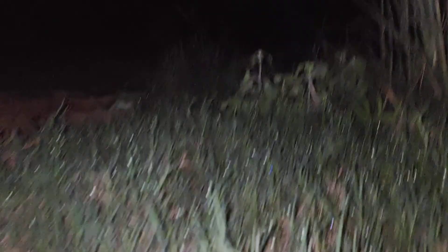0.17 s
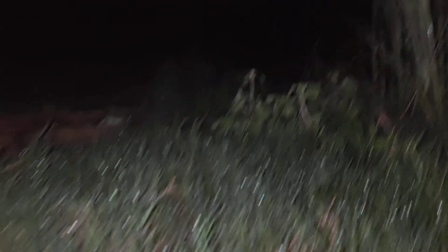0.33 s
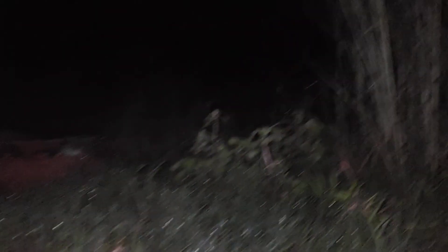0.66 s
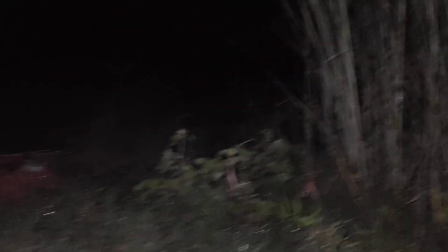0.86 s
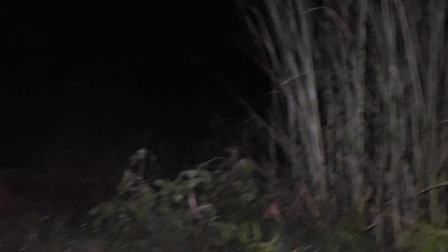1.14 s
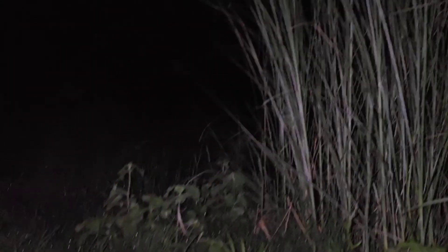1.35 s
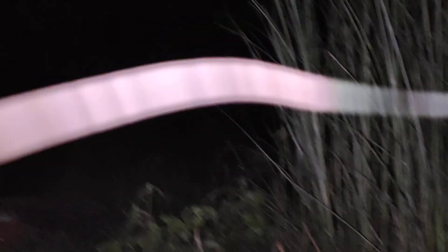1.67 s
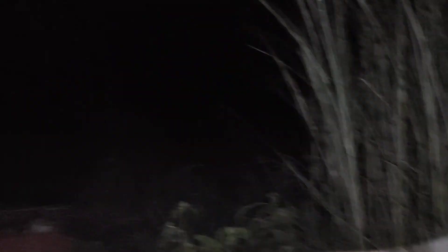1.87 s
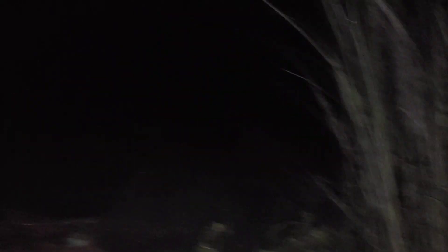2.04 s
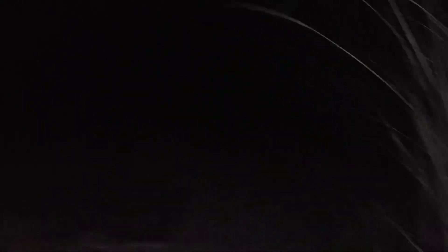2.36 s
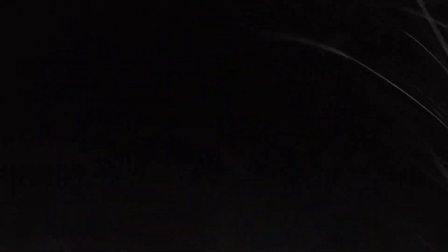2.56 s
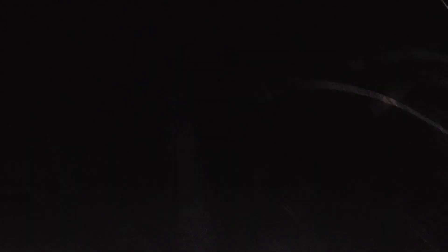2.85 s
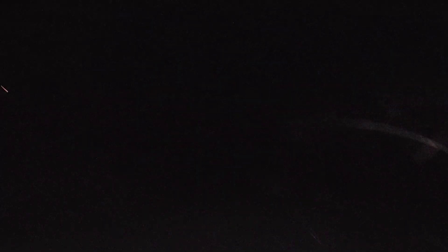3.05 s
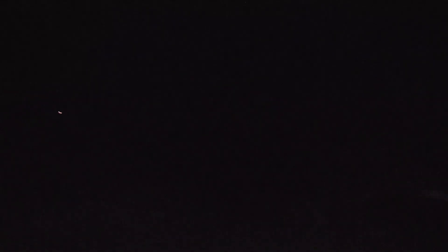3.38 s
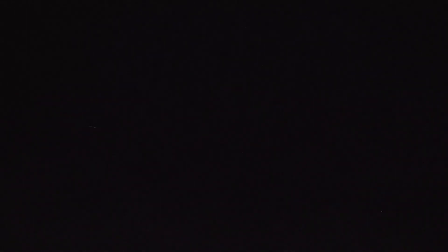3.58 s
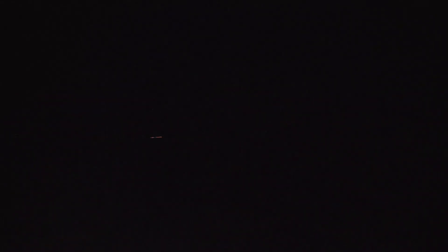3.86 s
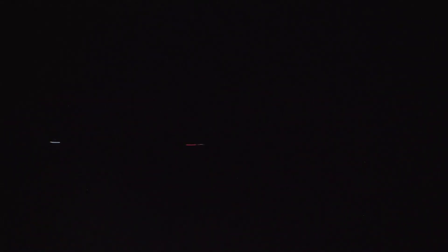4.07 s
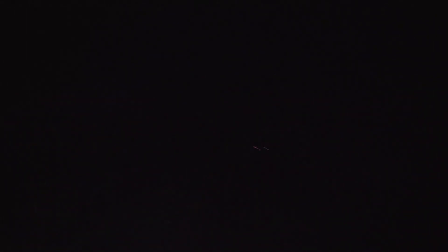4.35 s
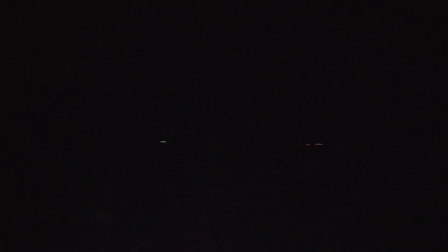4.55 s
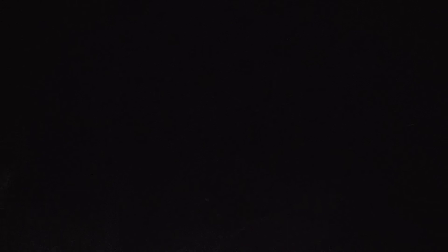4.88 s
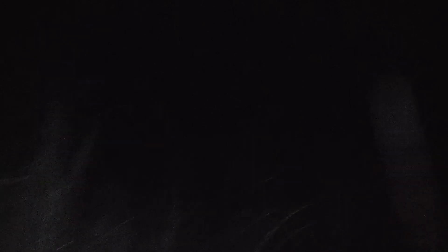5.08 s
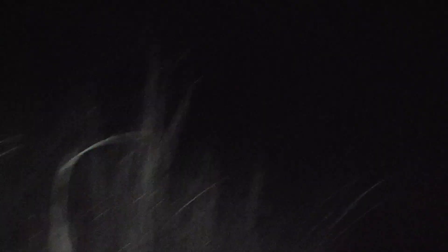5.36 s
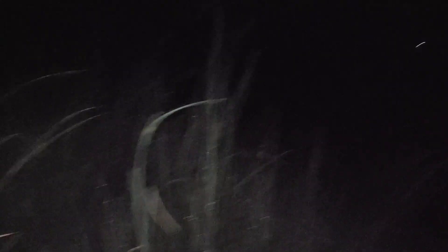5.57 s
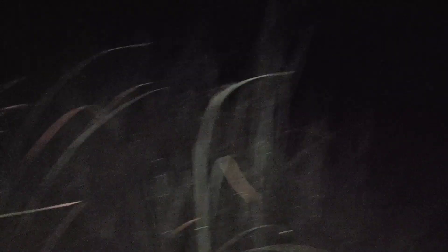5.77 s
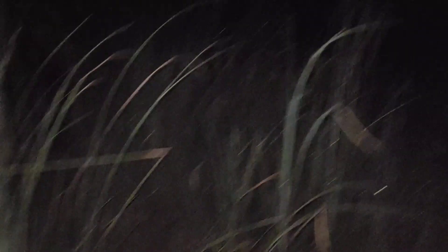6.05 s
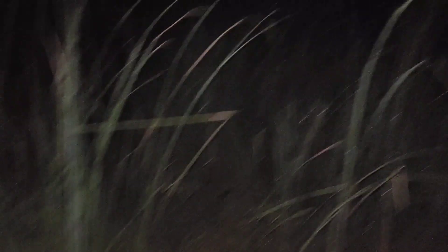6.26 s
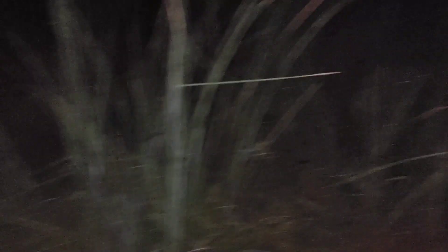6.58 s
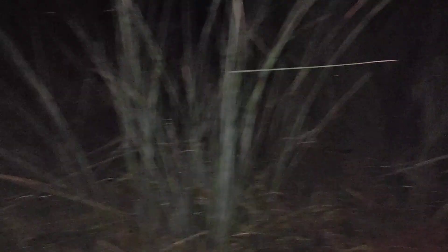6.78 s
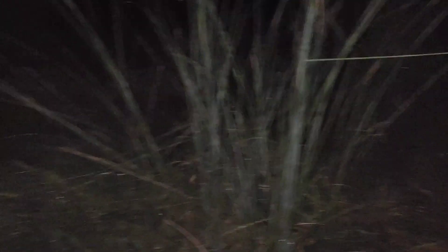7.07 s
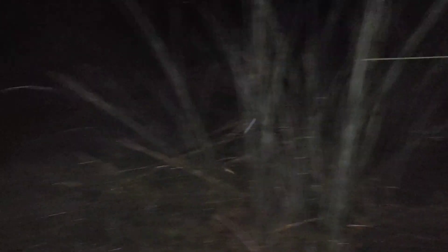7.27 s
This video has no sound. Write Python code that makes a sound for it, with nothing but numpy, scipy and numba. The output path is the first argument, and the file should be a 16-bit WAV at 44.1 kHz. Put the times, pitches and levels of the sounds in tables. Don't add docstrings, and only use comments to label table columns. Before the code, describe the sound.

Outdoors at night among tall grass, a close cricket gives quick double chirps over fast trills, rasping katydids and a steady high buzz. Far down a road a small motorbike thumps and climbs in pitch, falls to faint burbles mid-way for a gear shift, then settles into a low purr. One dry tick lands at about 2.5 seconds. Handheld stereo phone, turning slowly, so the insects shift in strength and side.

```python
import sys
import numpy as np
from scipy import signal
from scipy.fft import rfft, irfft
from scipy.io import wavfile
from scipy.ndimage import uniform_filter1d
from numba import njit

SR = 44100
rng = np.random.default_rng(int(sys.argv[2]) if len(sys.argv) > 2 else 0)


def transcribe(u):
    v = np.clip(np.atleast_2d(u).T, -1, 1)
    q = np.round(v * 32767).astype(np.int16)
    wavfile.write(sys.argv[1], SR, q)


def magnitude_from_level(level_db):
    exponent = np.asarray(level_db, float) / 20
    return 10 ** exponent


N = 327222

# (time [s], lag of the left port behind the right for the road [samples])
TURNING = [(0, 17.5), (1.4, 22.5), (2.3, 17), (3.2, 15), (4.1, 8.5), (5, -8.5), (5.8, -17), (7.42, -19)]
# (time [s], low chorus level [dB], high chorus level [dB], conehead level [dB])
STEADY_SINGERS = [(0.0, -57, -70, -69.5), (0.18, -57.5, -86, -68), (0.8, -58.5, -81, -69.5),
                  (1.6, -61.5, -61, -67.5), (2.2, -56.5, -60.5, -66), (3.0, -61.5, -55, -64),
                  (3.78, -55.5, -54, -63.5), (4.2, -53.5, -56, -63), (4.71, -52.5, -55, -63),
                  (5.6, -54.5, -56, -61.5), (6.3, -54, -59, -62), (7.09, -54.5, -59, -66.5),
                  (7.42, -58, -57, -62.5)]
# (first whistle [s], last whistle [s], level [dB], pitch [Hz])
WHISTLE_PHRASES = [(0.108, .156, -59, 3110), (0.409, 0.452, -61.5, 3140), (1.001, 1.12, -64.5, 3060),
                   (1.191, 1.298, -61, 3134), (1.511, 1.613, -58.5, 3027), (1.846, 1.902, -60, 2920),
                   (2.17, 2.256, -60.5, 2975), (2.52, 2.557, -61, 3100), (2.897, 2.935, -57.5, 2910),
                   (3.062, 3.183, -55, 2986), (3.422, 3.556, -54, 3026), (3.828, 3.87, -56.5, 3030),
                   (4.058, 4.184, -53, 2940), (4.385, 4.527, -56, 2960), (4.681, 4.775, -58, 2880),
                   (5.001, 5.098, -63, 2890), (5.204, 5.35, -59.5, 3034), (5.595, 5.626, -60, 2930),
                   (5.83, 5.878, -60.5, 2980), (5.944, 5.999, -57, 3060), (6.206, 6.253, -59, 2930),
                   (6.5, 6.595, -57.5, 2903), (6.745, 6.79, -61, 2914), (6.925, 7.104, -55.5, 2957),
                   (7.162, 7.254, -57.5, 2950)]


def level(x, db):
    return x * magnitude_from_level(db) / np.sqrt(np.mean(x ** 2))


def curves(table):
    s, *columns = np.transpose(table)
    return [np.interp(np.arange(N) / SR, s, c) for c in columns]


def at(s, curve):
    return curve[np.clip(s * SR, 0, N - 1).astype(int)]


def pan(db):
    return magnitude_from_level(np.array([db, -db]) / 2)


def colour(x, table):
    hz, db = np.transpose(table)
    log_f = np.log(np.fft.rfftfreq(N, 1 / SR) + 1)
    return irfft(rfft(x) * magnitude_from_level(np.interp(log_f, np.log(hz), db)), N)


def band(x, hz, width_hz):
    edges = [hz - width_hz / 2, hz + width_hz / 2]
    return signal.sosfilt(signal.butter(2, edges, "band", fs=SR, output="sos"), x)


def band_twice(x, hz, width_hz):
    return band(band(x, hz, width_hz), hz, width_hz)


def noise():
    return rng.standard_normal((2, N))


def walk(rate):
    k = int(SR / rate)
    held = np.repeat(rng.standard_normal(N // k + 1), k)
    return 1.83 * uniform_filter1d(uniform_filter1d(held, k), k)[:N]


def bouts(table, fade, rest_db=-100):
    t = np.arange(N) / SR
    levels = [rest_db + 0 * t]
    for start, end, db in table:
        outside_s = np.maximum(np.maximum(start - t, t - end), 0)
        levels.append(db - fade * outside_s)
    return np.max(levels, axis=0)


def beats(table):
    return np.concatenate([np.linspace(a, b, int(count)) for a, b, count in table])


@njit
def add(out, start, hz, gain, phase, length, slide, arch, lag, soft):
    for k in range(len(start)):
        for c in range(2):
            t0 = (start[k] + c * lag[k]) * SR
            for i in range(max(int(t0) + 1, 0), min(int(t0 + length * SR), out.shape[1])):
                u = (i - t0) / (length * SR) - .5
                cycles = length * (hz[k] * u + slide * u * u / 2 - 4 * arch * u ** 3 / 3)
                swell = np.cos(np.pi * u) ** soft
                out[c, i] += gain[c, k] * swell * np.sin(2 * np.pi * (cycles + phase[k]))


def strokes(mid_s, hz, db, pan_db, length_s, slide_hz=0., arch_hz=0.,
            scatter_db=1.5, scatter_hz=30, lag_ms=0., soft=2.):
    loudness, pitch, phase = rng.standard_normal((len(mid_s), 3)).T
    gain = magnitude_from_level(db + scatter_db * loudness) * pan(pan_db + 0 * mid_s)
    lag_s = lag_ms / 1000 + 0 * mid_s
    out = np.zeros((2, N))
    add(out, mid_s - length_s / 2, hz + scatter_hz * pitch, gain, phase,
        1. * length_s, 1. * slide_hz, 1. * arch_hz, lag_s, abs(soft) + 0.)
    return out


def chirps(s, db, hz, pan_db, rate, chirp_s, rise=0, **stroke):
    half = int(chirp_s * rate / 2)
    step = np.arange(-half, half + 1) / rate
    swell_db = 20 * np.log10(np.cos(np.pi * step / (1.1 * chirp_s)) + 0.2)

    def spread(v):
        return (v + 0 * s)[:, None] + 0 * step

    stroke_s = (spread(s) + step).ravel()
    stroke_hz = (spread(hz) + rise * step).ravel()
    stroke_db = (spread(db) + swell_db).ravel()
    return strokes(stroke_s, stroke_hz, stroke_db, spread(pan_db).ravel(), **stroke)


def chorus(rates, hz, db, pan_db, spread_hz, length_s):
    out = 0
    for rate in rates:
        s = (np.arange(N / SR * rate) + rng.random()) / rate
        own_hz = hz + spread_hz * rng.uniform(-1, 1)
        lag_ms = rng.uniform(-.5, .5)
        own_db = db + 1.3 * walk(7)
        out = out + strokes(s, own_hz, at(s, own_db), at(s, pan_db), length_s,
                            slide_hz=-200, scatter_hz=spread_hz / 2, lag_ms=lag_ms)
    return out


def night():
    # (centre [Hz], width [Hz], level [dB])
    air_bands = [(61, 110, -87.5), (298, 310, -80), (775, 370, -84), (1230, 490, -84.5), (1725, 570, -78),
                 (2193, 535, -75.5), (4650, 410, -75.5), (5220, 600, -79), (6230, 1360, -76.5),
                 (8700, 860, -70), (9870, 1000, -73), (12400, 7600, -84)]
    out = level(noise(), -84)
    for hz, width_hz, db in air_bands:
        mid, side = band_twice(noise(), hz, width_hz)
        both = mid + min(.3 + hz / 900, 1) * side * np.array([[1], [-1]])
        out += level(both, db) * magnitude_from_level(.9 * walk(4) + 2.2 * walk(12))
    return out


def fields():
    # (time [s], low field level [dB], high field level [dB])
    field_levels = [(0, -71, -60), (.6, -73, -61.5), (1.5, -69, -60), (2.1, -72.5, -60), (2.85, -66.5, -58),
                    (3.2, -72, -56.5), (3.9, -72.5, -60.5), (4.4, -68.5, -58), (4.8, -72, -60.5),
                    (5.6, -72.5, -57.5), (6.1, -76, -60), (6.4, -76, -65), (6.9, -77, -65.5),
                    (7.42, -78, -60.5)]
    low_db, high_db = curves(field_levels)
    out = 0
    for hz, width_hz, db in ((3752, 500, low_db - 2.5), (4074, 780, low_db - 5.5),
                             (7130, 360, high_db - 0.5), (7750, 1200, high_db)):
        out = out + level(band_twice(noise(), hz, width_hz), 0) * magnitude_from_level(db + 2.4 * walk(12))
    return out


def triller():
    # (time [s], level [dB], left minus right [dB], lag of the right port [ms])
    trill_path = [(0, -51, -12, 0.11), (.4, -55.5, -11, .12), (.75, -55, -6, 0.12), (1.3, -60, -7, 0.21),
                  (1.45, -64, -2, 0.21), (1.75, -61, -8, 0.15), (1.9, -53.5, -6, 0.14),
                  (2.4, -66, -18, 0.078), (2.8, -59, -16, 0.087), (3.4, -57, -18, 0.15),
                  (3.9, -52, -16.5, 0.18), (4.4, -53.5, -15, .22), (4.7, -64, -21, 0.26),
                  (5.6, -60.5, -17, 0.42), (6.1, -62, -13, 0.32), (6.7, -75, -20, 0.21),
                  (7.1, -62.5, -22, 0.34), (7.42, -58.5, -14, 0.27)]
    db, pan_db, lag_ms = curves(trill_path)
    group_s = 3.414 + np.arange(-59, 69)[:, None] / 17.08
    s = (group_s + np.arange(4) * .013).ravel()
    out = strokes(s, 6620, at(s, db) + 6, at(s, pan_db), length_s=.009, slide_hz=350,
                  scatter_db=1.5, scatter_hz=25, lag_ms=at(s, lag_ms))
    return out + chorus([76, 83, 70], 6600, db - 11, pan_db, spread_hz=120, length_s=.009)


def choruses():
    low_db, high_db, _ = curves(STEADY_SINGERS)
    turn = curves(TURNING)[0]
    low_pan = -12 + 0.079 * turn
    high_pan = -6.5 + 0.17 * turn
    out = chorus([73, 81, 66, 88], 6360, low_db - 4, low_pan, spread_hz=230, length_s=.011)
    out += chorus([69, 78, 91], 6050, low_db - 18.5, low_pan, spread_hz=93, length_s=0.0077)
    out += chorus([130.7, 142.6, 117.3, 151.0, 164.4], 9600, high_db - 3.0, high_pan,
                  spread_hz=360, length_s=0.0034)
    out += chorus([124, 141, 133], 8880, high_db - 2.0, high_pan + 4, spread_hz=540, length_s=0.013)
    return out


def conehead():
    # (pitch [Hz], density [dB per Hz])
    buzz_colour = [(6470, -87), (11000, -22), (11500, -8), (12400, -11.5), (13400, -7.5), (14500, -2),
                   (15600, -6.5)]
    db = curves(STEADY_SINGERS)[2]
    pan_db = -15 - 0.34 * curves(TURNING)[0]
    closure_hz = 295.6 * (1 + .0018 * walk(5))
    closures = np.diff(np.floor(np.cumsum(closure_hz / SR)), prepend=0)
    late = 0.28 * uniform_filter1d(rng.standard_normal((2, 513)), size=24, axis=1) + np.pi / 2
    scrape = irfft(np.exp(-1j * np.cumsum(late, axis=1)))
    comb = np.array([signal.fftconvolve(closures, h)[:N] for h in scrape])
    rasp = signal.fftconvolve(closures, np.hanning(100))[:N] * noise()
    buzz = colour(level(comb, 0) + level(rasp, -6), buzz_colour)
    return level(buzz, 0) * magnitude_from_level(db + 0.36 * walk(4.8)) * pan(pan_db)


def exhaust():
    # (time [s], firing rate [Hz], level [dB])
    engine = [(0.0, 17.5, -56.5), (0.14, 17.5, -53.5), (0.45, 19.7, -52), (0.68, 19.2, -52),
              (0.91, 21.1, -52), (2.5, 28.8, -55), (2.67, 30.8, -58), (2.87, 29.9, -59), (3.2, 23.3, -73),
              (3.93, 18, -84), (4.11, 23.2, -61), (4.28, 20.7, -57), (4.92, 20.9, -53.5), (6.32, 21.9, -54),
              (7.27, 21.8, -59), (7.42, 22.2, -89)]
    # (time [s], round trip [ms], strength of its echo [0-1])
    pipe_echo = [(0, 20.5, .5), (1.0, 20, .45), (1.9, 19.4, .55), (2.3, 16.3, .3), (2.7, 19, .45),
                 (4.1, 18.8, .15), (4.9, 18.3, .2), (5.5, 17.8, .3), (6.3, 17.3, .4), (6.8, 17.1, .65),
                 (7.42, 17, .6)]
    hz, db = curves(engine)
    cruise = np.clip((np.arange(N) / SR - 4) / 3.4, 0, 1)
    bark_db = -18.5 + 1 * (hz - 21) - 31 * cruise
    phase = np.cumsum(hz * (1 + 0.006 * walk(25.09))) / SR + .7
    firing = np.diff(np.floor(phase), prepend=0) * magnitude_from_level(.6 * walk(30))
    trip_ms, echo = curves(pipe_echo)
    trip = trip_ms * SR / 1000
    puff = uniform_filter1d(firing, size=24)
    n = np.arange(N)
    pipe = sum((-echo) ** k * np.interp(n - k * trip, n, puff) for k in range(4))
    thump = pipe
    for centre_hz, width_hz in ((167.5, 136), (146.4, 100), (166, 129), (174, 128)):
        thump = band(thump, centre_hz, width_hz)
    boom = level(band(band(firing, 95, 22), 77.0, 30), -2)
    boom = boom + level(band_twice(pipe, 178.5, 77), 15.5)
    bark = level(band_twice(pipe, 300, 145), 0)
    bark = bark + level(band(rng.standard_normal(N), 282, 87), -6)
    return magnitude_from_level(db) * (level(thump, 0) + magnitude_from_level(bark_db) * (bark + boom))


def tyres():
    # (time [s], centre of the hiss [Hz], level [dB])
    tyre_hiss = [(0.0, 510, -83), (0.6, 404, -88.5), (1.9, 560, -74), (2.65, 720, -64), (3.1, 679, -73),
                 (3.95, 710, -70.5), (4.15, 617, -66.5), (4.9, 535, -67), (5.8, 610, -67),
                 (6.65, 865, -68.5), (7.42, 680, -83)]
    centre_hz, db = curves(tyre_hiss)
    out = 0
    for hz in (439.0, 581.0, 728, 820):
        share_db = -28 * np.log2(hz / centre_hz) ** 2 + 1.8 * walk(9)
        hiss = band_twice(rng.standard_normal(N), hz, hz / 3.27)
        out = out + magnitude_from_level(share_db) * level(hiss, -1.56)
    return magnitude_from_level(db) * out


def near_cricket():
    # (time [s], level [dB], left minus right [dB], lag of the right port [ms])
    near_chirps = [(0.03, -45, -8, 0.43), (0.188, -44, -4, 0.458), (0.336, -43.5, -4, 0.447),
                   (0.488, -44, -2, 0.445), (0.638, -42.5, 0.6, 0.43), (0.791, -42, -3, 0.44),
                   (0.939, -42.5, -5, 0.407), (1.092, -43, -5, 0.39), (1.244, -42.5, -8.5, 0.384),
                   (1.396, -41.5, -5, 0.378), (1.547, -41.5, -4.4, 0.37), (1.698, -40.5, -4.6, 0.39),
                   (1.849, -41.5, -3, 0.399), (2.002, -44, -5, 0.421), (2.154, -44, 1, 0.452),
                   (2.31, -45.5, -4, 0.463), (2.456, -48.5, -2, 0.36), (2.61, -44, -2, 0.369),
                   (2.759, -45, -4, 0.36), (2.914, -48, -4, 0.36), (3.064, -45, -6, 0.365),
                   (3.22, -46, 2, 0.36), (3.366, -49, -4, 0.347), (3.518, -47, -7, 0.36),
                   (4.35, -52.5, -13, 0.44), (4.489, -45, -7.5, 0.44), (4.646, -47, -12, 0.45),
                   (4.796, -46, -12, 0.402), (4.948, -46, -12, 0.37), (5.101, -48, -14, 0.33),
                   (5.25, -49, -5, 0.465), (5.402, -46, -6, 0.455), (5.559, -45.5, -7.5, 0.45),
                   (5.706, -45.5, -3, 0.42), (5.856, -49.5, -1.6, 0.398), (6.011, -54.5, -3, 0.37),
                   (6.166, -50, -7, 0.45)]
    stroke_gap_s = .038
    shape = dict(length_s=.032, slide_hz=-180, arch_hz=280, scatter_db=.7, scatter_hz=15, soft=.9)
    s, db, pan_db, lag_ms = np.tile(np.transpose(near_chirps), 2)
    second = np.arange(len(s)) >= len(near_chirps)
    out = strokes(s + stroke_gap_s * second, 7430, db + 3 * second + 3.0, pan_db, lag_ms=lag_ms, **shape)
    rival_s = np.linspace(5.365, 5.96, 5)
    rival_s = np.r_[rival_s, rival_s + stroke_gap_s]
    return out + strokes(rival_s, 7170, -58 + 5, -4, lag_ms=0.41, **shape)


def low_katydid():
    # (time [s], level [dB], left minus right [dB])
    low_buzzes = [(0.0662, -52, 3.0), (0.5232, -54, 4), (0.8457, -53, 2), (1.1119, -57, -5),
                  (1.3694, -56, -3), (2.2094, -46, 0), (2.5194, -49, -2), (2.7736, -45, 1),
                  (3.0694, -46, 8), (3.324, -49, -1), (3.7244, -53, 18), (4.012, -46, 4), (4.2616, -51, 4),
                  (4.5481, -51, 7.5), (4.9501, -62, 32), (5.1094, -52, -1), (5.466, -49, -4),
                  (5.8101, -55, 10), (5.959, -53, -3), (6.3566, -51, 6), (6.596, -50, 0), (6.8813, -61, 9),
                  (7.1994, -59, -11)]
    s, db, pan_db = np.transpose(low_buzzes)
    return chirps(s + 0.019, db, 8070, pan_db, 216, 0.057,
                  length_s=0.0082, slide_hz=-400, scatter_hz=123, lag_ms=-0.28)


def katydids():
    # (first chirp [s], last chirp [s], chirps [count])
    chirp_runs = [(0.09, 0.338, 3), (0.83, 1.71, 8), (1.87, 2.87, 9), (3.01, 3.77, 7), (4.2, 4.72, 5),
                  (4.87, 6.11, 11), (6.242, 6.52, 3), (6.67, 7.22, 5)]
    # (time [s], level [dB], pitch [Hz], left minus right [dB], level of the neighbour [dB])
    katydid_path = [(0.2, -57, 8540, 6, -63), (0.4, -59, 8600, 7, -66), (0.9, -75, 8660, 0, -74),
                    (1.2, -68, 8600, 5, -64), (1.53, -63, 8700, 11, -59), (1.95, -60, 8200, 8, -65),
                    (2.4, -58, 8400, 13, -63), (2.86, -54, 8500, 8, -63), (3.3, -50.5, 8734, 8, -54),
                    (3.77, -51, 8600, 6, -53), (4.3, -68, 8600, 6, -60), (4.75, -68, 8720, 7, -62),
                    (5.0, -56, 8570, 4, -56), (5.55, -61, 8740, 9, -59), (6.12, -56.5, 8530, 12, -62),
                    (6.38, -56, 8650, 10, -55), (6.8, -63, 8754, 0, -62), (7.2, -59, 8980, 2, -55)]
    rise_hz_per_s = 770
    s = beats(chirp_runs)
    db, hz, pan_db, neighbour_db = (at(s, c) for c in curves(katydid_path))
    out = chirps(s, db + 7, hz, pan_db, 131, .115, rise_hz_per_s,
                 length_s=.006, slide_hz=-800, scatter_db=2.5, scatter_hz=130, lag_ms=.3)
    out += chirps(s, neighbour_db + 4, 9060, pan_db - 7, 143, 0.102, rise_hz_per_s,
                  length_s=0.0042, slide_hz=-800, scatter_db=2.5, scatter_hz=167, lag_ms=-0.197)
    return out


def whistles():
    gap_s, sag_hz_per_s, shy_start_db, tired_end_db = .048, 530, -6, -1.5
    rows = []
    for first, last, db, hz in WHISTLE_PHRASES:
        length = last - first
        u = np.linspace(0, 1, max(round(length / gap_s), 1) + 1)
        rows.append([first + u * length,
                     hz - sag_hz_per_s * (u - .5) * length,
                     db + shy_start_db * (1 - u) ** 2 + tired_end_db * u ** 2])
    return np.concatenate(rows, axis=1)


def far_whistlers():
    s, hz, db = whistles()
    s = s + 0.0146 + .008 * rng.standard_normal(len(s))
    out = strokes(s, hz, db + 1, -1.5, length_s=0.068, slide_hz=-430,
                  scatter_db=2, scatter_hz=45, lag_ms=-0.36)
    answers = np.array(WHISTLE_PHRASES)[:, :-1] + [-.01, .05, -3.5]
    swell_db = bouts(answers, fade=163, rest_db=-71)
    for rate, hz, lag_ms in ((16.34, 3000, 0.492), (21.4, 2900, -0.488), (12.4, 3100, 0.24)):
        uneven = 0.23 * rng.standard_normal(int(N / SR * rate) + 1)
        s = (np.arange(N / SR * rate) + uneven) / rate
        out += strokes(s, hz, at(s, swell_db) - 4, -1.5, length_s=.045, slide_hz=-260,
                       scatter_db=3.5, scatter_hz=70, lag_ms=lag_ms)
    return out + level(band_twice(noise(), 2980, 450), -6) * magnitude_from_level(swell_db)


def chain():
    # (start [s], end [s], level [dB])
    chain_whine = [(0.3, 1.1, -74.5), (1.2, 1.75, -71), (1.85, 2.2, -70.5), (2.55, 2.85, -71),
                   (4.45, 5.0, -73)]
    whine_db = bouts(chain_whine, fade=43) + 1.5 * walk(8)
    return level(band(rng.standard_normal(N), 1523, 293), 0) * magnitude_from_level(whine_db)


def zips():
    # (time [s], level [dB], left minus right [dB])
    high_zips = [(0.307, -58.5, 15), (0.762, -59, 18), (1.242, -57.5, 15), (1.731, -58.5, 16),
                 (2.208, -53.5, 13.5), (2.726, -56, 15), (3.141, -55.5, 14), (3.657, -53, 9),
                 (4.132, -53.5, 10), (4.524, -57, 6), (4.968, -58, 5), (5.449, -53, -1), (5.917, -60, -1),
                 (6.407, -58, 10), (6.95, -60, -10)]
    s, db, pan_db = np.transpose(high_zips)
    return chirps(s, db + 9, 11800, pan_db, 390, 0.041, length_s=0.0007, slide_hz=-2500,
                  scatter_db=0.5, scatter_hz=700, lag_ms=0.313)


def grass_brush():
    # (start [s], end [s], level [dB])
    brushes = [
        (1.7, 1.76, -74),
        (2.45, 3.0, -71),
        (3.15, 3.25, -69),
        (5.99, 6.06, -70),
    ]
    rub = level(band_twice(noise(), 1060, 370), 0)
    return rub * magnitude_from_level(bouts(brushes, fade=220) + 1.5 * walk(12))


def far_ticker():
    # (start [s], end [s], level [dB])
    ticking = [(1.85, 2.35, -67.5), (2.45, 2.9, -63.5), (3.15, 3.6, -68), (3.85, 4.35, -62.5),
               (4.62, 4.88, -61.5), (5.0, 5.2, -61), (5.43, 5.68, -62.5), (5.85, 6.05, -64.5),
               (6.18, 6.6, -62), (6.75, 6.85, -60.5), (6.95, 7.42, -62)]
    tick_db = bouts(ticking, fade=143)
    blur = level(band(noise(), 5000, 640), -5.0) * magnitude_from_level(tick_db)
    s = 6.272 + np.arange(-201, 37) / 32.1 + .001 * rng.standard_normal(238)
    return blur + strokes(s, 5130, at(s, tick_db) + 4.5, -4, length_s=.022, slide_hz=-800,
                          scatter_db=2.5, scatter_hz=50, lag_ms=-.45)


def snap():
    # (time [s], peak level [dB])
    stem_ticks = [
        (2.538, -23),
    ]
    hit = np.zeros(N)
    for s, db in stem_ticks:
        rebounds = round(s * SR) + np.array([30, 44, 130, 240])
        hit[rebounds] = magnitude_from_level(db) * np.array([-0.8, 0.25, 0.081, .3])
    ring = 2.8 * band(hit, 1380, 1500) + 2.0 * band(hit, 1140, 300) + 2.1 * band(hit, 1900, 350)
    return pan(-10)[:, None] * (ring + 1.2 * band(hit, 6500, 10000))


def burbles():
    # (time [s], peak level [dB], pitch [Hz])
    pipe_burbles = [(2.992, -56, 131), (3.0, -59, 86), (3.13, -64, 81), (3.064, -55.5, 148),
                    (3.151, -62, 127), (3.263, -62.5, 95.5), (3.382, -63, 91), (3.43, -64, 99),
                    (3.539, -68, 110), (3.733, -67, 127), (3.778, -63, 123), (3.877, -65, 124)]
    s, db, hz = np.transpose(pipe_burbles)
    return strokes(s + 0.0207, hz, db, 0, length_s=0.079, scatter_db=1.3, scatter_hz=2.2)[0]


def scatter(song):
    tail = rng.standard_normal((2, 6000)) * np.exp(-np.arange(6000) / (.025 * SR))
    tail /= np.sqrt(np.sum(tail ** 2, axis=1, keepdims=True))
    return signal.fftconvolve(song, tail, axes=1)[:, :N]


def from_the_road(bike):
    lag, n = curves(TURNING)[0], np.arange(N)
    return np.array([np.interp(n - side * lag / 2, n, bike) for side in (1, -1)])


def scene():
    insects = triller() + choruses() + conehead() + near_cricket() + low_katydid() + katydids() + zips()
    far = far_whistlers() + far_ticker()
    wet = scatter(magnitude_from_level(-10) * insects + magnitude_from_level(-5) * far)
    road = from_the_road(exhaust() + tyres() + chain() + burbles())
    return insects + far + wet + road + night() + fields() + grass_brush() + snap()


def roll_off(x):
    return signal.sosfilt(signal.butter(12, 15560, fs=SR, output="sos"), x)


def record(dry):
    top = signal.ellip(8, .2, 70, 15500, fs=SR, output="sos")
    return roll_off(signal.sosfilt(top, dry))


dry = scene()
out = record(dry)
transcribe(out)
```